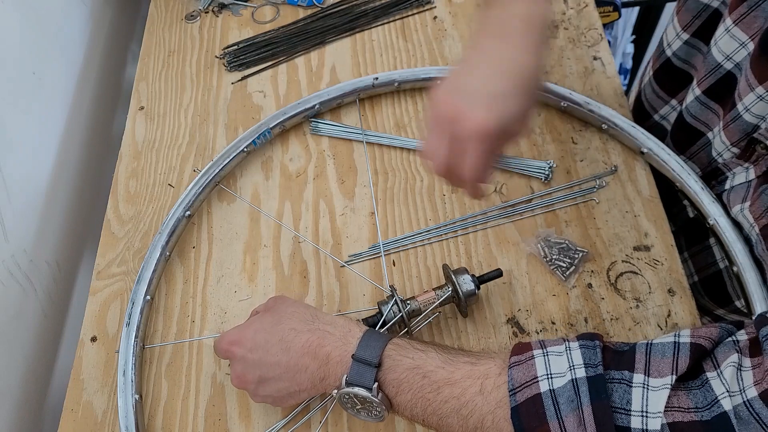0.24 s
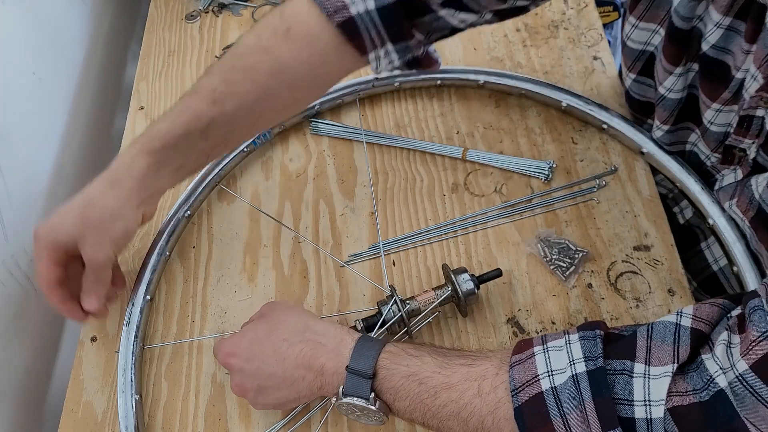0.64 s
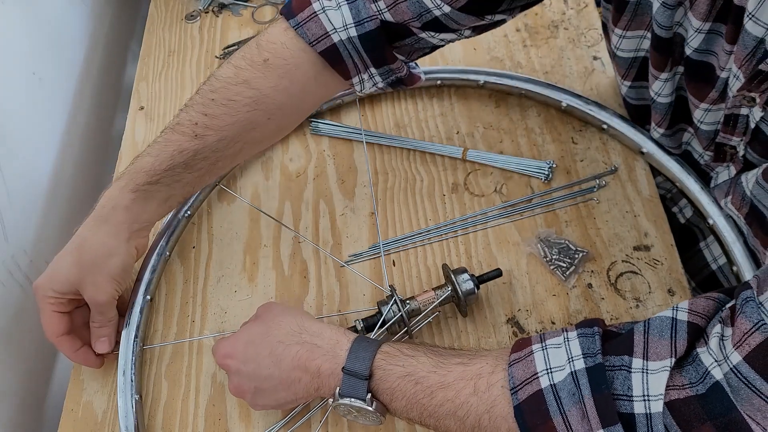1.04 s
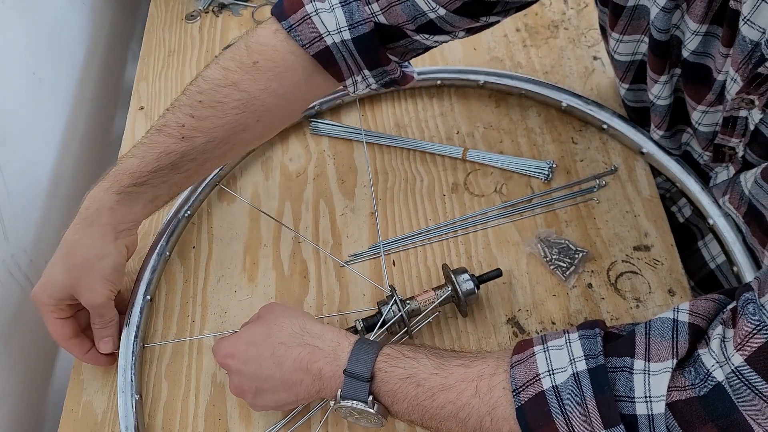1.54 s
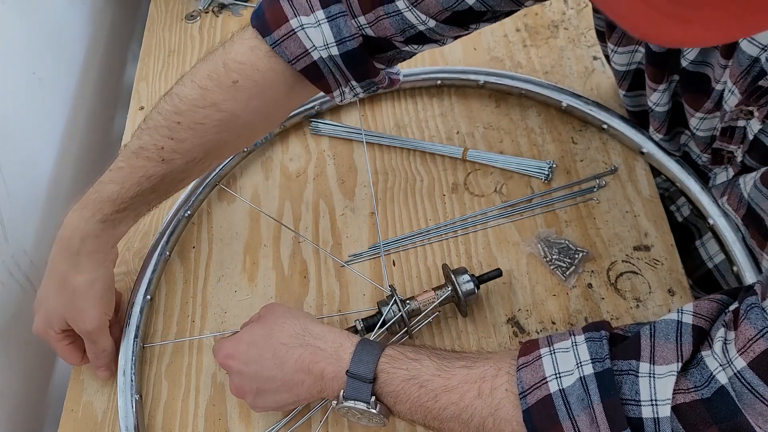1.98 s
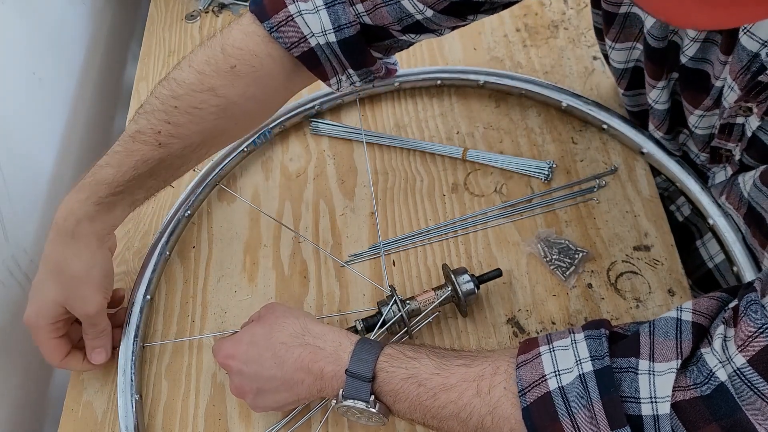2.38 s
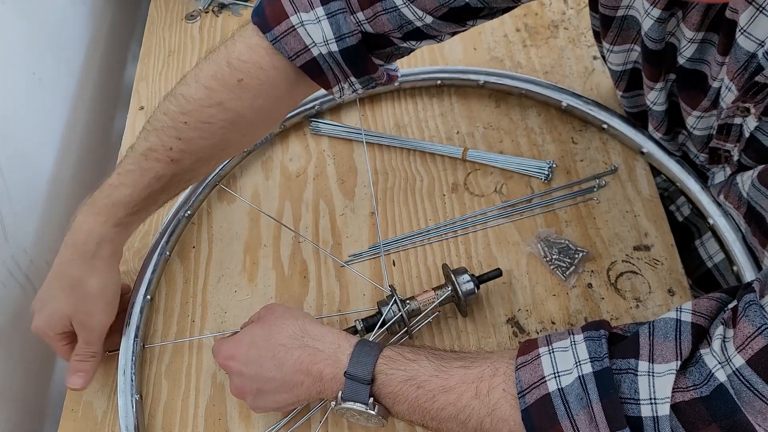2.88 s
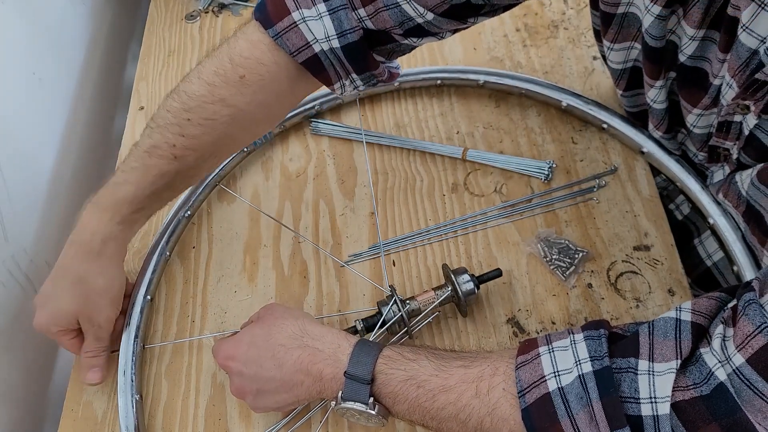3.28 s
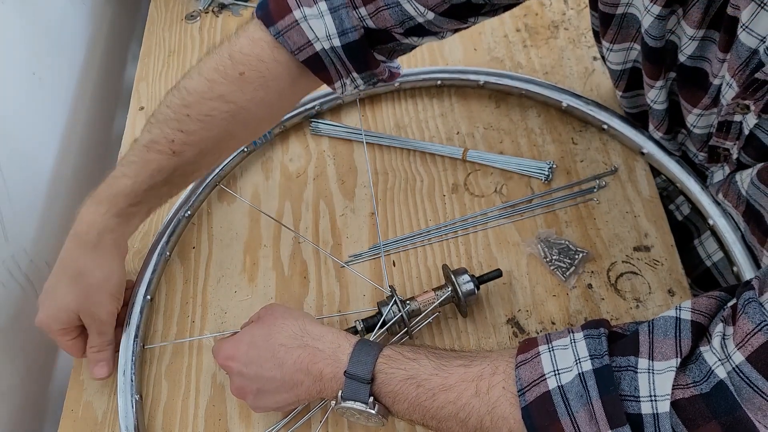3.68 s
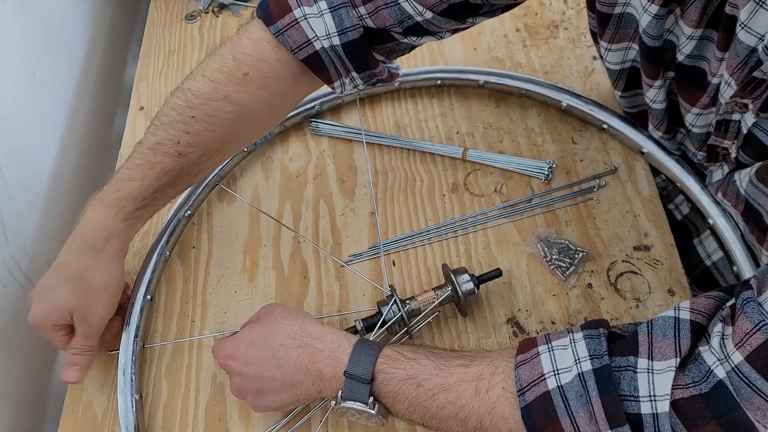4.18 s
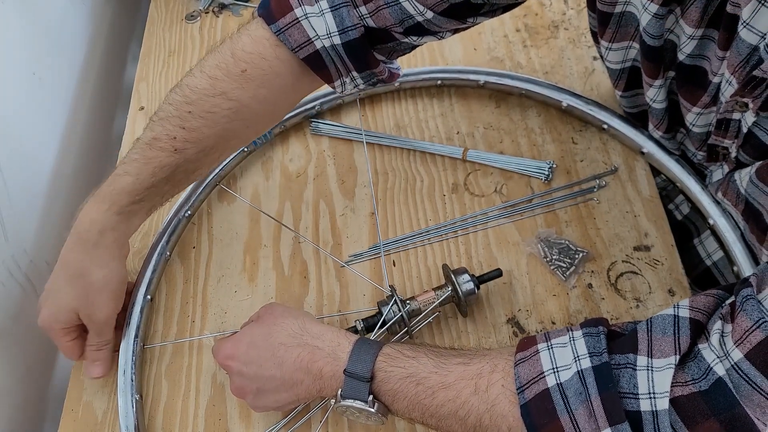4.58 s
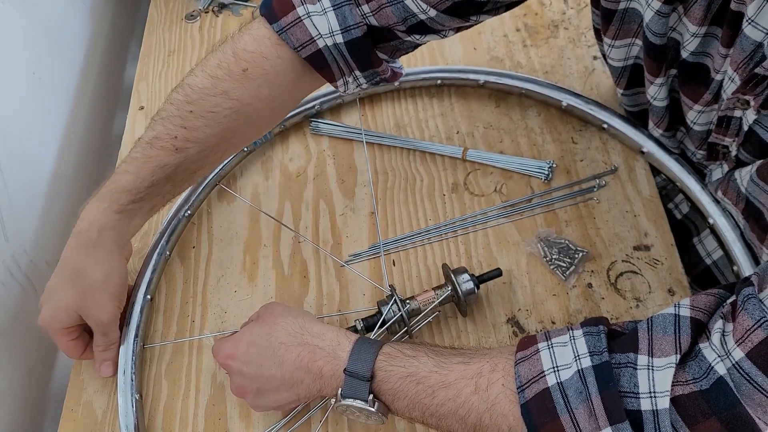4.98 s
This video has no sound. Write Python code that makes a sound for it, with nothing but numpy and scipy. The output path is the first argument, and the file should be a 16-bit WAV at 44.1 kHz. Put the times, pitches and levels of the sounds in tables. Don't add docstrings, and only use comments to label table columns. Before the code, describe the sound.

Small bright metallic clicks of a spoke and nipple grow busier, with dull bench knocks later and a faint early bird whistle.

```python
import sys
import numpy as np
from scipy import signal
from scipy.fft import rfft, irfft, next_fast_len
from scipy.io import wavfile

SR = 44100
rng = np.random.default_rng(int(sys.argv[2]) if len(sys.argv) > 2 else 0)


def voltage_ratio(level):
    return 10 ** (np.asarray(level, float) / 20)


def persist_wave(psi):
    counts = np.round(np.clip(psi, -1, 1) * 32767).astype(np.int16)
    wavfile.write(sys.argv[1], SR, np.atleast_2d(counts).T)


N = 230675

# start_s, tyre_roar_db, engine_rumble_db
TRAFFIC = [(0.0, -64, -57), (0.8, -63, -60.5), (1.5, -60.5, -56.5), (2.0, -60.5, -64.5),
           (2.3, -62.5, -58.5), (2.55, -65.5, -69.5), (2.8, -64, -57.5), (3.4, -63.5, -59.5),
           (4.1, -62, -52), (4.5, -63, -54.5), (5.23, -61.5, -55)]
# pitch_hz, level_db_per_hz
RUMBLE_SPECTRUM = [(12, -76), (20, -37), (41, -0.5), (59, 3.5), (73, 4), (92, -5.5), (108, -2.5),
                   (135, -7.5), (200, -21.5), (260, -46), (440, -120)]
# pitch_hz, level_db_per_hz
ROAR_SPECTRUM = [(71, -36), (120, -10), (187, -5), (226, 0), (269, -3.5), (637, 0.5), (881, 1), (1090, -6),
                 (2030, -26.5), (2480, -34), (3000, -39.5), (3900, -47), (6600, -120)]
# pitch_hz, level_db_per_hz
HISS_SPECTRUM = [(1180, -31), (2000, -1), (2960, -9), (5350, -10), (7250, -8), (10600, -11), (15100, -8),
                 (16000, -13)]
# pitch_hz, likeness (-1 to 1)
LIKENESS = [(40, 1), (200, 0.74), (500, 0.19), (1000, -0.36), (4000, 0.096), (12000, 0.052)]
# start_s, length_s, climb_s, first_hz, top_hz
WHISTLES = [
    (0.695, 0.265, 0.14, 2260, 2600),
    (1.04, 0.28, 0.18, 2090, 2555),
]
# start_s, level_db
RUB = [(0.0, -64.5), (0.13, -72), (0.28, -105), (0.77, -66.5), (0.96, -86), (1.28, -100), (1.5, -87),
       (1.85, -81.5), (2.36, -72), (2.5, -105), (2.75, -76), (2.99, -68), (3.57, -70), (3.9, -64.5),
       (4.03, -77.5), (4.2, -68), (4.9, -71), (5.23, -75)]
# pitch_hz, level_db_per_hz
RUB_SPECTRUM = [(1060, 7), (1800, -2.5), (2480, -15), (3910, -19), (5250, -5.5), (8750, -11.5),
                (15100, -13), (16000, -14)]
# start_s, peak_db, t60_s
KNOCK = [
    (2.977, -36, 0.07),
]
# pitch_hz, width_hz, level_db
KNOCK_MODES = [(266, 115, 2.5), (370, 40, 9), (532, 40, 5), (763, 54, 5), (1210, 67, 6)]
# start_s, peak_db, hardness_db (per octave), damping_factor
THUMPS = [(1.349, -73, 16, 0.51), (2.012, -45, -4.5, 1.6), (2.417, -55, 1.5, 0.71), (2.843, -52, -13, 2.2),
          (2.923, -49, -18, 0.74), (3.104, -51.5, -4, 0.83), (3.216, -25.5, -10.5, 0.39),
          (3.315, -27.5, -12, 1.04), (3.412, -36, -13.5, 0.7), (3.493, -42, -12, 4), (3.58, -42, -16, 3.2),
          (3.669, -15.5, -5.5, 0.81), (3.763, -30.5, -12, 1.3), (3.86, -53, -11, 0.37),
          (3.989, -47, -3.5, 1.7), (4.092, -49, -11, 0.65), (4.186, -48.5, -9.5, 0.52),
          (4.348, -46.5, -6, 1.63), (4.469, -84, -17, 0.78), (4.521, -42, -11, 0.33),
          (4.557, -37.5, -18.5, 0.91), (4.666, -32, -12.5, 1), (4.77, -50.5, -4, 0.54),
          (4.897, -44.5, -4, 1.4), (5.010, -29, -8.5, 0.68), (5.102, -37.5, -14.5, 1.56),
          (3.239, -22, -7.5, 1.4)]
# pitch_hz, level_db, t60_s
BENCH_MODES = [(61.6, -40, 1.3), (157.7, 1, 0.076), (240.6, -5, 0.24), (330, -3, 0.16), (381.8, -4.5, 0.17),
               (486.6, -7.5, 0.16), (766, -17.5, 0.26), (606, -13, 0.057), (1060, -66, 0.46)]
# pitch_hz, level_db_per_hz
WOOD_SPECTRUM = [(15, -49), (25, -15), (75, -39), (150, 2), (350, 5), (560, -6.5), (757, -9.5),
                 (2500, -32.5), (3250, -108), (5500, -120)]
# pitch_hz, width_hz, level_db
RIM_MODES = [(1980, 120, -11), (2150, 20, -11), (2690, 120, -7), (3070, 49, -9), (3460, 50, -3),
             (4020, 65, -6), (4790, 43, -2), (5050, 40, -7), (6090, 38, 0), (6690, 40, -9), (7150, 43, -1),
             (7310, 24, -7), (7600, 57, -7), (8030, 47, -8), (8300, 30, -11), (8690, 61, -9),
             (9490, 37, -10), (9730, 51, -7), (10400, 42, -12), (10600, 42, -12), (11200, 95, -10),
             (12500, 100, -5), (12700, 56, -5), (13300, 55, -10), (13600, 93, -11), (14200, 250, -9)]
# pitch_hz, level_db_per_hz
RATTLE_SPECTRUM = [(710, -1), (1200, -12.5), (2250, -12), (3430, -6.5), (4450, -3.5), (4860, -8),
                   (5410, -3), (6030, -1), (8910, -2.5), (12500, 0.5), (16000, 1)]
# start_s, peak_db, rattle_t60_s, ring_db, favoured_hz
TICKS = [(0.1446, -55, 0.026, 2, 8950), (0.283, -72, 0.24, 9, 7500), (0.6749, -60, 0.42, -1, 6770),
         (1.243, -59.5, 0.21, -5, 11000), (1.3447, -49, 0.39, 1.5, 10100), (1.541, -64, 0.27, 3, 7050),
         (1.5589, -55.5, 0.17, -6, 7060), (2.001, -56, 0.12, -5, 11800), (2.1327, -46, 0.15, 2, 9400),
         (2.4124, -42.5, 0.13, -4, 5650), (2.767, -45, 0.25, -2, 7600), (2.977, -46, 0.4, -22, 2900),
         (3.1009, -37, 0.094, 0.5, 8560), (3.243, -46.5, 0.16, 1, 5650), (3.5614, -43, 0.14, -4, 8400),
         (3.7631, -41.5, 0.1, -12, 5800), (4.3187, -58, 0.2, 7.5, 6200), (4.3581, -40.5, 0.13, -2, 6700),
         (4.5446, -44, 0.14, 3.5, 4600), (4.6668, -45, 0.17, -3, 4500), (4.9835, -66, 0.66, 2, 7700)]
# start_s, peak_db, rattle_t60_s, ring_db, favoured_hz
SLIPS = [(0.1, -61.5, 0.15, -1, 7800), (1.4175, -68, 0.063, 12, 6080), (1.807, -66.5, 0.59, -12, 4080),
         (2.66, -71.5, 0.28, -1, 6500), (2.32, -67, 0.65, -4, 6500), (2.4242, -48, 0.25, -17, 5040),
         (2.8181, -48.5, 0.13, -3, 6160), (3.193, -55.5, 1, -8, 8650), (3.5088, -50.5, 0.096, -10, 6140),
         (3.646, -52, 0.2, -4, 6000), (3.6716, -35.5, 0.21, -13, 2830), (4.088, -63.5, 0.6, 2, 7640),
         (4.1975, -49, 0.11, 12, 7100), (4.2134, -48, 0.12, 6, 6940), (4.2494, -66, 0.081, 6, 7140)]
# start_s, peak_db, rattle_t60_s, ring_db, favoured_hz
SHIVERS = [(3.297, -42, 0.17, -1, 6950), (3.325, -42.5, 0.1, 1.5, 4340), (3.4483, -49, 0.22, -13, 6270),
           (3.47, -50, 0.15, 3, 4960), (3.697, -33, 0.072, 7, 12100), (3.7186, -45, 0.19, 10.5, 4870),
           (3.7796, -34, 0.073, -3, 6000), (3.892, -54.5, 0.24, -6, 4880), (4.3728, -38, 0.061, -0.5, 7500),
           (4.5594, -48.5, 0.12, -5, 5500), (4.7793, -58, 0.5, -3, 6240), (5.0394, -61, 0.16, 0, 7160),
           (5.0854, -57, 0.32, -9, 6150), (5.1186, -54, 0.14, 0, 6080)]

GARAGE_T60_S, WALL_CUT_HZ = 0.33, 3160
HISS_DB = -88.5
SAG_HZ_PER_S, WHISTLE_DB, WHISTLE_RELEASE_S = 410, -60.5, 0.04
CATCH_BEFORE_END_S, CATCH_S, CATCH_DB = 0.078, 0.014, -12
KNOCK_RISE_S, KNOCK_IN_ROOM = 0.007, 0.3
SWELL_S, SETTLE_S = 0.0054, 0.03
HEAVY_SLOWS = 0.18
SHAKE_DB, SHAKE_FOLLOWS = -49.5, 0.43
SHAKE_RISE_S, SHAKE_T60_S = 0.019, 0.54
RING_WIDENS = 1.15
PORT_LAG = 5
TILT_DB, TILT_DB_PER_OCTAVE = -16, 18.5
SHIVER_TILT_DB = -17


def rms_one(x):
    return x / np.sqrt(np.mean(x ** 2) + 1e-20)


def balance(db):
    return voltage_ratio([[db], [-db]])


def in_time(rows):
    start_s, *columns = np.transpose(rows)
    return [np.interp(np.arange(N) / SR, start_s, column) for column in columns]


def at_hz(points, hz):
    point_hz, value = np.transpose(points)
    return np.interp(np.log(hz), np.log(point_hz), value)


def drift(rate_hz):
    r = np.exp(-2 * np.pi * rate_hz * 40 / SR)
    chance = rng.standard_normal(N // 40 + 2002)
    slow = rms_one(signal.lfilter([1], [1, -2 * r, r * r], chance)[2000:])
    return np.interp(np.arange(N) / 40, np.arange(len(slow)), slow)


def resonate(x, hz, width_hz):
    r = np.exp(-np.pi * width_hz / SR)
    feedback = [1, -2 * r * np.cos(2 * np.pi * hz / SR), r * r]
    return signal.lfilter([(1 - r * r) / 2, 0, (r * r - 1) / 2], feedback, x)


def coloured(spectrum, patchy_db):
    size = next_fast_len(N)
    hz = np.maximum(np.fft.rfftfreq(size, 1 / SR), 1)
    alike = np.clip(at_hz(LIKENESS, hz), -1, 1)
    mid, side = rfft(rng.standard_normal((2, size))) * voltage_ratio(at_hz(spectrum, hz))
    both = np.sqrt(1 + alike) * mid + np.sqrt(1 - alike) * side * [[1], [-1]]
    edges = np.geomspace(spectrum[0][0], spectrum[-1][0], 5)
    total = np.zeros((2, N))
    for low, high in zip(edges, edges[1:]):
        band = irfft(both * (hz >= low) * (hz < high), size)[:, :N]
        total += voltage_ratio(patchy_db * drift(4.8)) * band
    return rms_one(total)


def hiss():
    return voltage_ratio(HISS_DB + 4.5) * coloured(HISS_SPECTRUM, patchy_db=1.0)


def garage(x):
    size = next_fast_len(N + SR)
    w = 2 * np.pi * np.fft.rfftfreq(size)
    dull = 1 / (1 + 1j * w * SR / (2 * np.pi * WALL_CUT_HZ))
    sides = []
    for lags_s in rng.uniform(0.011, 0.04, (2, 6)):
        response = 0
        for k, lag_s in enumerate(lags_s):
            loop = voltage_ratio(-60 * lag_s / GARAGE_T60_S) * dull * np.exp(-1j * w * round(lag_s * SR))
            response = response + (-1) ** k * loop / (1 - loop)
        sides.append(irfft(rfft(x, size) * response, size)[:N])
    return np.array(sides)


def shudder():
    t, power = np.arange(N) / SR, np.zeros(N)
    for start_s, peak_db, _, _ in THUMPS:
        age = np.maximum(t - start_s, 0)
        level_db = SHAKE_DB + SHAKE_FOLLOWS * (peak_db + 38.5) - 60 * age / SHAKE_T60_S
        power += (voltage_ratio(level_db) * np.minimum(age / SHAKE_RISE_S, 1)) ** 2
    return np.sqrt(power)


def traffic_and_shudder():
    roar_db, rumble_db = in_time(TRAFFIC)
    engines = voltage_ratio(rumble_db - 1 * drift(3.6))
    rumble = np.hypot(engines, shudder()) * coloured(RUMBLE_SPECTRUM, patchy_db=-2.5)
    return rumble + voltage_ratio(roar_db + 4.5) * coloured(ROAR_SPECTRUM, patchy_db=1.85)


def bird():
    out, t = np.zeros(N), np.arange(N) / SR
    for start_s, length_s, climb_s, first_hz, top_hz in WHISTLES:
        age = np.clip(t - start_s, 0, length_s)
        left_s = length_s - age
        climb = 1 - np.maximum(1 - age / climb_s, 0) ** 1.6
        hz = first_hz + (top_hz - first_hz) * climb - SAG_HZ_PER_S * np.maximum(age - climb_s, 0)
        catch = voltage_ratio(CATCH_DB * np.exp(-((left_s - CATCH_BEFORE_END_S) / CATCH_S) ** 2))
        fade = climb * catch * np.clip(left_s / WHISTLE_RELEASE_S, 0, 1)
        flutter = voltage_ratio(2.5 * drift(25))
        phase = 2 * np.pi * np.cumsum(hz + 22 * drift(60)) / SR
        out += voltage_ratio(WHISTLE_DB - 10.5) * flutter * fade * np.sin(phase)
    return out


def fingers():
    rub_db, = in_time(RUB)
    return voltage_ratio(rub_db - 3.5) * coloured(RUB_SPECTRUM, patchy_db=-1.0)


def knock():
    (start_s, peak_db, t60_s), = KNOCK
    t = np.arange(N) / SR - start_s
    fall = voltage_ratio(-60 * np.maximum(t, 0) / t60_s)
    burst = rng.standard_normal(N) * np.clip(t / KNOCK_RISE_S, 0, 1) * fall + 1e-18
    burst[round(start_s * SR):][:20] += 0.5
    body = sum(voltage_ratio(level_db) * resonate(burst, hz, width_hz) for hz, width_hz, level_db in KNOCK_MODES)
    return voltage_ratio(peak_db - 3.5) * body / np.abs(body).max()


def thumps():
    out, t = np.zeros(N + SR), np.arange(2 ** 14) / SR
    bins_hz = np.maximum(np.fft.rfftfreq(len(t), 1 / SR), 1)
    for start_s, peak_db, hard_db, damping in THUMPS:
        strength_db = rng.normal(0, 1.5, len(BENCH_MODES))
        detune = rng.normal(1, 0.012, len(BENCH_MODES))
        swell_s = max(SWELL_S * voltage_ratio(HEAVY_SLOWS * (peak_db + 29)), 0.002)
        settle = voltage_ratio(-250 * np.maximum(t - SETTLE_S, 0))
        shape = (1 - np.exp(-t / swell_s)) ** 2 * settle
        fall_db = -60 * t * max(damping, 0.2)
        wood_db = at_hz(WOOD_SPECTRUM, bins_hz) + 0.5 * hard_db * np.log2(bins_hz / 200)
        grain = irfft(rfft(rng.standard_normal(len(t))) * voltage_ratio(wood_db))
        body = voltage_ratio(-7) * rms_one(grain) * voltage_ratio(fall_db / 0.3)
        for k, (hz, level_db, t60_s) in enumerate(BENCH_MODES):
            level = voltage_ratio(level_db + strength_db[k] + hard_db * np.log2(hz / 200))
            fall = voltage_ratio(fall_db / min(1.72 * t60_s, 0.6))
            body += (-1) ** k * level * fall * np.sin(2 * np.pi * hz * detune[k] * t)
        out[round(start_s * SR):][:len(t)] += voltage_ratio(peak_db - 1.5) * shape * body
    return out[:N]


def rim(touches, rise_s, crack, base_db, db_per_octave):
    out, t = np.zeros((2, N + SR)), np.arange(3 * 2 ** 12) / SR
    hz = np.maximum(np.fft.rfftfreq(len(t), 1 / SR), 1)
    click = 1.0 * (t == 0)
    modes = rfft([voltage_ratio(level_db) * resonate(click, mode_hz, RING_WIDENS * width_hz)
                  for mode_hz, width_hz, level_db in RIM_MODES])
    modes_hz = np.array(RIM_MODES)[:, 0]
    colour = voltage_ratio(at_hz(RATTLE_SPECTRUM, hz)) * (hz > RATTLE_SPECTRUM[0][0])
    low_pass = signal.butter(2, 8000, fs=SR)
    for start_s, peak_db, t60_s, ring_db, best_hz in touches:
        tilt_db = base_db + db_per_octave * np.log2(best_hz / 6000)
        tilt = (hz / 6000) ** (0.048 * (tilt_db + 2))
        ripple = voltage_ratio(np.interp(hz, np.arange(180) * 125, 4 * rng.standard_normal(180)))
        shared, own = rng.standard_normal(len(t)), rng.standard_normal((2, len(t)))
        both = 0.38 * np.array([shared, np.roll(shared, PORT_LAG)]) + 1.25 * own
        noise = irfft(rfft(both) * colour * ripple * tilt, len(t))
        dull = signal.lfilter(*low_pass, noise)
        fading = dull + (noise - dull) * voltage_ratio(-60 * t / 0.62)
        grain = voltage_ratio(2.0 * np.repeat(rng.standard_normal(len(t) // 64), 64))
        fall = voltage_ratio(-60 * t / max(t60_s, 0.02)) + crack * voltage_ratio(-60 * t / 0.0009)
        rattle = fading / noise.std() * grain * fall * np.minimum(t / rise_s, 1)
        strength_db = rng.normal(0, 1.8, len(RIM_MODES))
        favoured_db = 10.5 * np.exp(-(np.log(modes_hz / best_hz) / 0.12) ** 2)
        ring = irfft(rfft(rattle) * (voltage_ratio(strength_db + favoured_db) @ modes), len(t))
        touch = voltage_ratio(peak_db - 7.5) * (rattle + voltage_ratio(ring_db + 11.0) * ring)
        out[:, round(start_s * SR):][:, :len(t)] += touch
    return out[:, :N] * balance(1.8)


def wheel_metal():
    ticks = rim(TICKS, rise_s=0.0017, crack=0.71, base_db=TILT_DB, db_per_octave=TILT_DB_PER_OCTAVE)
    slips = rim(SLIPS, rise_s=0.005, crack=0, base_db=TILT_DB, db_per_octave=TILT_DB_PER_OCTAVE)
    shivers = rim(SHIVERS, rise_s=0.01, crack=0, base_db=SHIVER_TILT_DB, db_per_octave=2)
    return ticks + slips + shivers


def scene():
    background = hiss() + traffic_and_shudder()
    call, hands, tap, bench, metal = bird(), fingers(), knock(), thumps(), wheel_metal()
    near = call * balance(3.5) + tap * balance(1.5) + bench * balance(0.8) + metal
    room = voltage_ratio(-8) * garage(call) + voltage_ratio(-17) * garage(bench)
    room += voltage_ratio(-11.0) * garage(metal[0] - metal[1] + KNOCK_IN_ROOM * tap)
    return background + hands + room + near


def top_cut(x):
    return signal.sosfilt(signal.butter(12, 16410, fs=SR, output="sos"), x)


def record(dry):
    low_pass = signal.cheby1(12, 0.5, 15900, fs=SR, output="sos")
    mix = signal.sosfilt(low_pass, dry)
    return top_cut(mix)


dry = scene()
out = record(dry)
persist_wave(out)
```